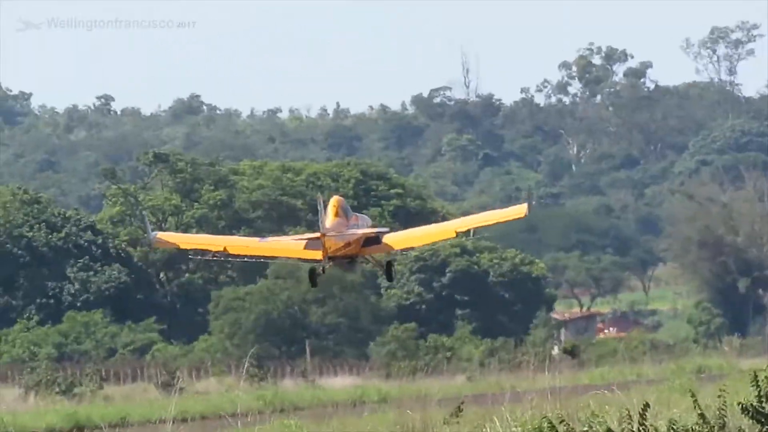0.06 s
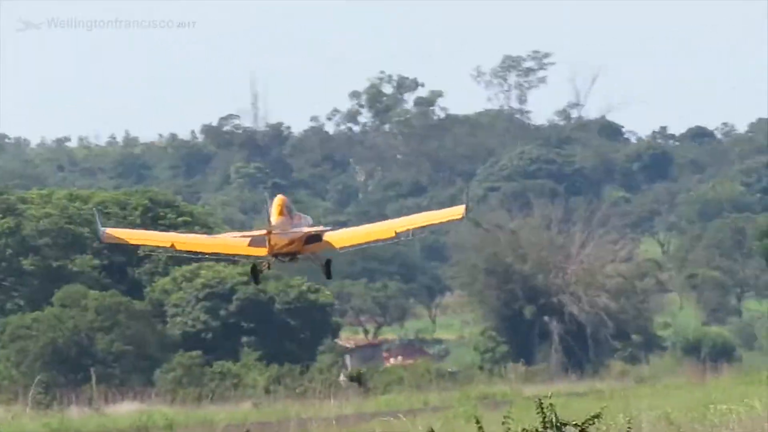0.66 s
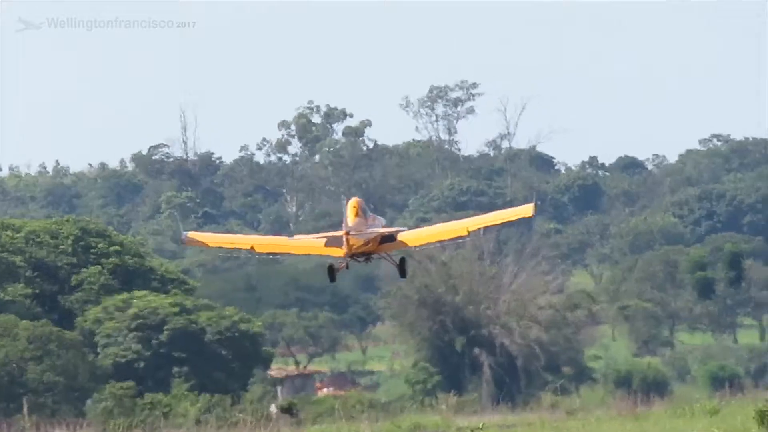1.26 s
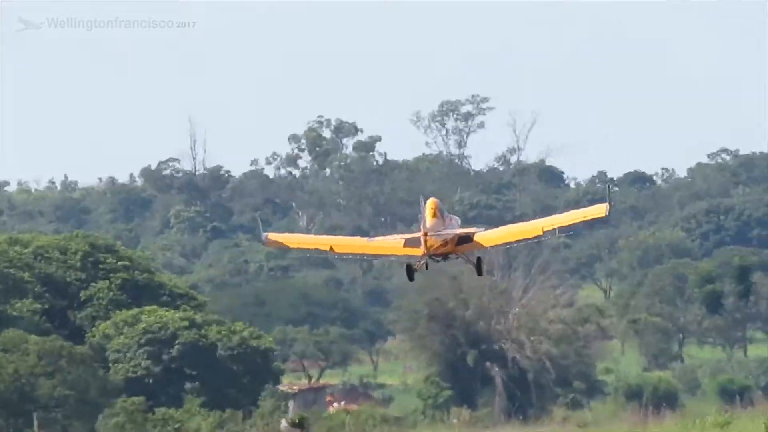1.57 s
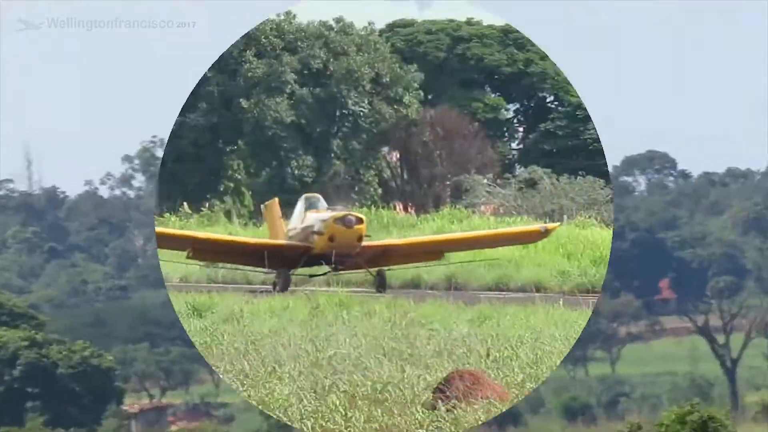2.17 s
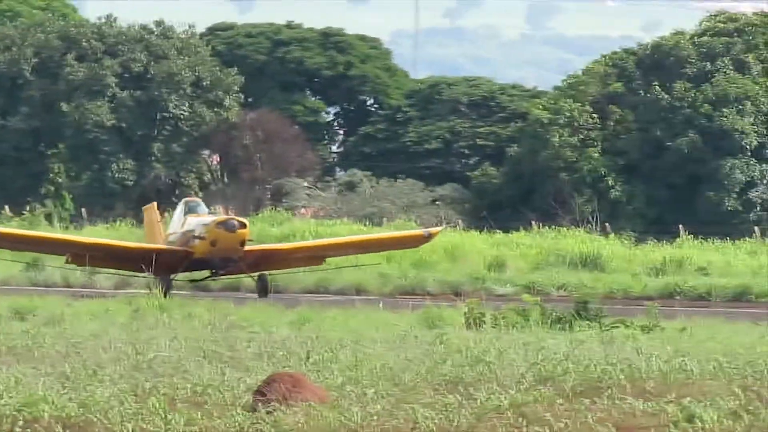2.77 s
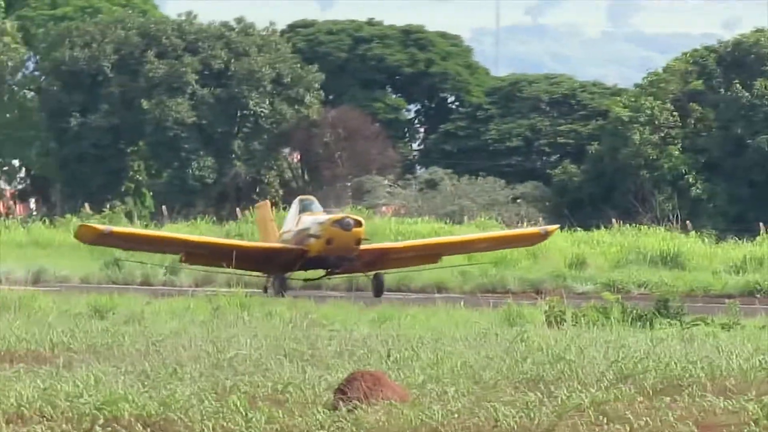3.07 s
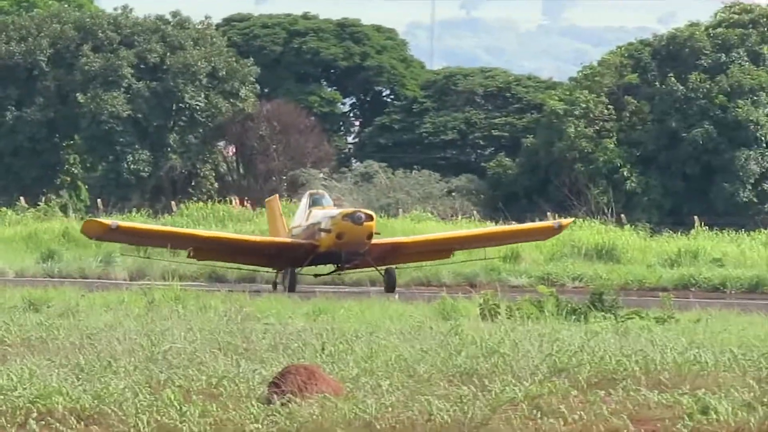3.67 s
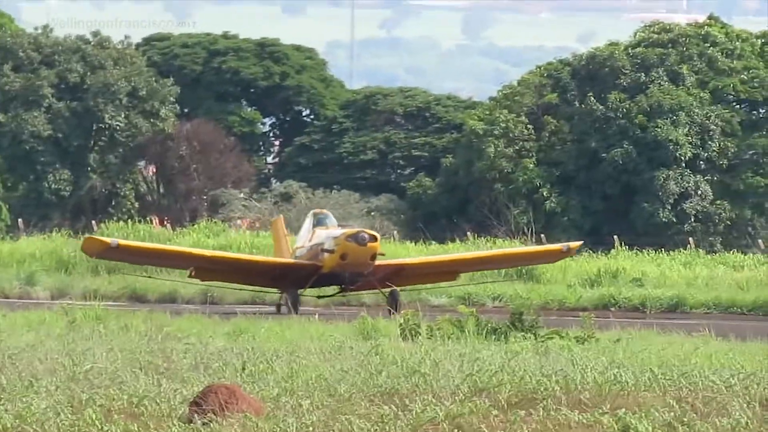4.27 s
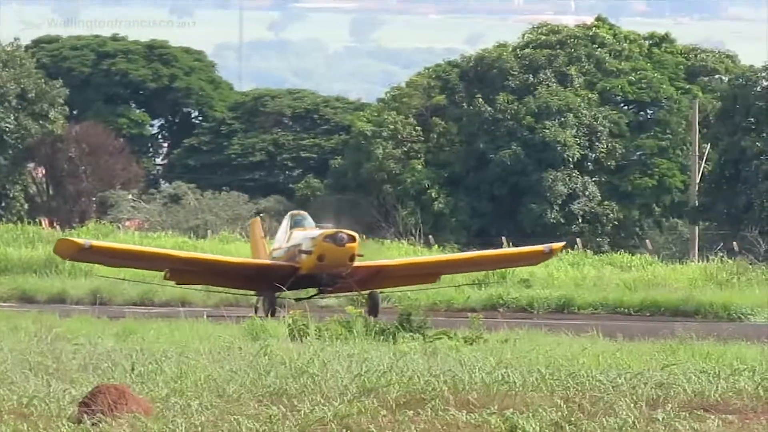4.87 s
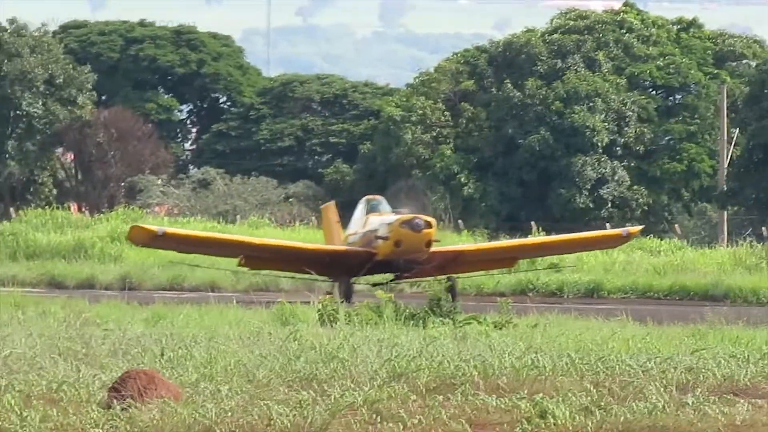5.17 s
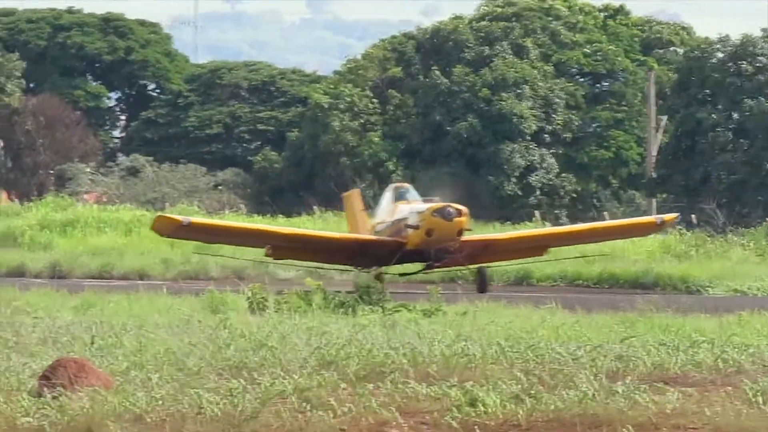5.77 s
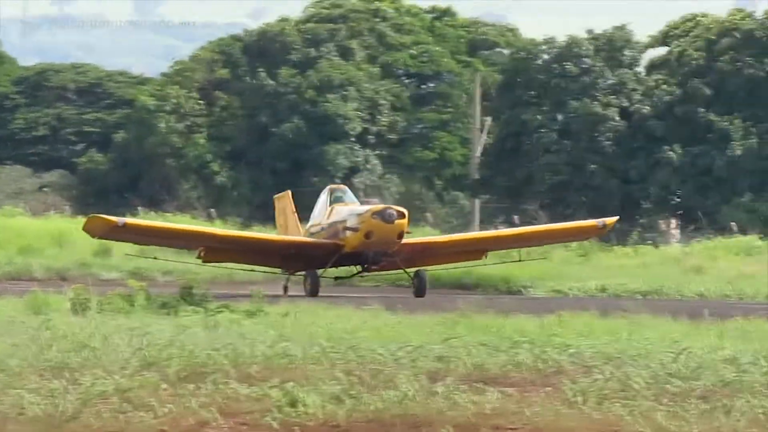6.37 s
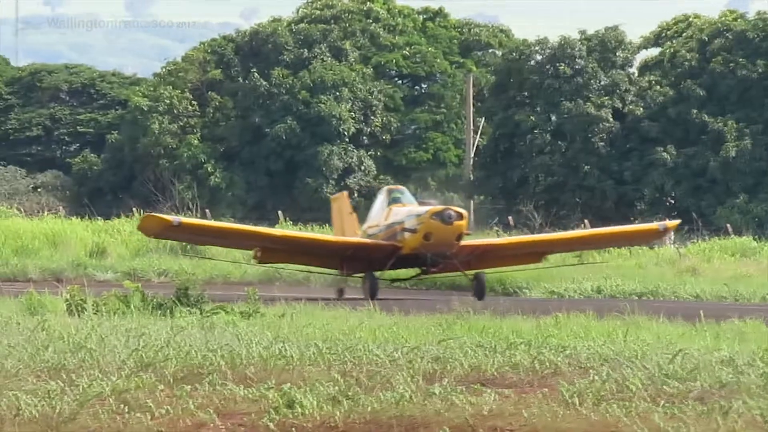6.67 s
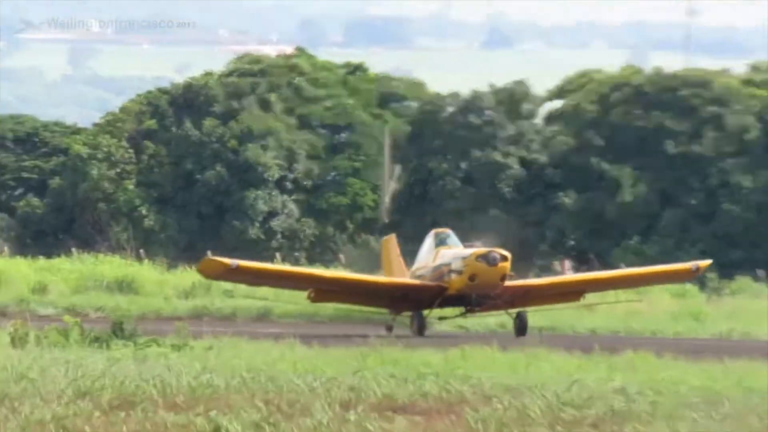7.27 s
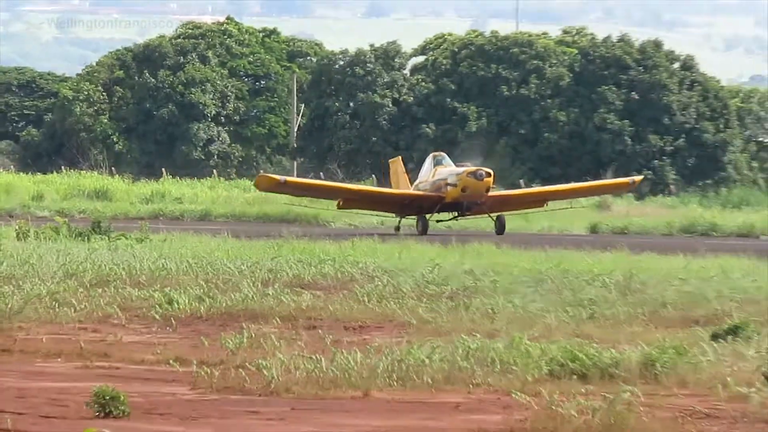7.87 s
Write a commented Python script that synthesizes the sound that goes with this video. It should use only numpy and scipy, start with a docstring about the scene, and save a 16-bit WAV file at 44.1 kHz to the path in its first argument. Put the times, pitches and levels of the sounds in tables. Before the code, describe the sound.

Outdoors by a grass-lined airstrip, a throttled-back plane hums in the distance while a bird chirps faintly and an insect barely trills. A quick cross-fade then brings a single piston-engine propeller plane close to the microphone at full power. Its loud, slightly higher drone stays steady in pitch, with a gritty exhaust rasp and fast ticking knocks that sometimes crack harder, gaining a little volume and brightness until the end.

```python
"""A crop duster drones far off over the fields, throttled back, while an insect trills and a bird chirps
in the grass. A cross-fade brings the plane up close, at full power on the airstrip, growing louder and
brighter as it rolls nearer. Eight uneven exhaust pulses a cycle drone with the propeller, and every
firing spits rasping gas. Up close, one cylinder cracks once a cycle."""
import sys
import numpy as np
from scipy import signal
from scipy.fft import rfft, irfft, next_fast_len
from scipy.io import wavfile
from scipy.ndimage import map_coordinates

SR = 44100
rng = np.random.default_rng(int(sys.argv[2]) if len(sys.argv) > 2 else 0)


def wav_out(sig):
    """Save sig, one row per channel (or a flat mono array), as 16-bit PCM at SR to the path in sys.argv[1]."""
    wavfile.write(sys.argv[1], SR, np.round(np.clip(np.atleast_2d(sig).T, -1, 1) * 32767).astype(np.int16))


N = 358533
TIME = np.arange(N) / SR
HZ = np.fft.rfftfreq(N, 1 / SR)

# the drone's partials, near and far: multiple_of_cycle, relative_db
NEAR_ORDERS = [(2, -34), (3, -18), (4, -26.5), (5, -6.5), (6, -2), (7, -4), (8, 2.5), (9, -7.5), (10, -5),
               (11, -2), (12, -12.5), (13, -15.5), (14, -16), (15, -11), (16, -22), (18, -30.5),
               (19, -27.5), (21, -32), (22, -36.5), (27, -26.5), (29, -39), (30, -39), (32, -39), (35, -35),
               (36, -40), (42, -41), (43, -40)]
FAR_ORDERS = [(3, -14), (4, -7), (6, 6), (7, -20.5), (8, -14.5), (9, -3), (10, -14), (12, -3.5),
              (13, -19.5), (14, -27.5), (15, -15), (18, -26), (32, -34.5), (86, -31)]
# the exhaust's rhythm, one row a cylinder: place_cycles, pulse_db, gas_burst_db
FIRINGS = [(-.015, .3, 2), (.123, -4.4, -5), (.255, 2.3, -2), (.393, -1.6, -2), (.482, 0, -2),
           (.612, -.1, -4), (.735, 2.7, -3), (.854, .5, -5)]
# the propeller's rhythm, one row a blade: place_cycles, pulse_db
BLADES = [(0, 0), (1 / 3, -1), (2 / 3, -2)]
# two notes are beamed, and change as the plane turns: time_s, firing_note_db, next_order_db
BEAMED_NOTES = [(2.6, 4, 5.5), (3.2, 1.14, 1.5), (4.9, 1.96, 4.5), (6.7, 0, -4), (7.05, -1.5, -3.5),
                (7.5, -1.5, 1.5), (8.1, -1.5, -1)]
# the 600 Hz overtone fades in and out: time_s, gain_db
OVERTONE_RIDE = [(2.3, -8), (2.75, 0), (3.9, -.5), (4.5, -3.5), (5.1, -13), (5.8, -2), (6.5, -11),
                 (6.95, -5), (7.4, -10), (8.1, -8)]
# colour of the exhaust gas, near and far: frequency_hz, gain_db
NEAR_RASP_EQ = [(300, -31.5), (450, -5), (600, -1), (740, -3.5), (950, 4.5), (1230, 4.5), (1640, 1.5),
                (2350, 2), (2850, -9.5), (3650, -11.5), (5900, -25), (7600, -35), (9800, -48.5),
                (12000, -65.5)]
FAR_RASP_EQ = [(220, -32.5), (380, -3), (500, 0), (581, -3), (618, -2.5), (850, -6.5), (1050, -3),
               (1280, -7.5), (1680, -6.5), (1900, -8), (2240, -9), (4290, -21.5), (4980, -19.5),
               (5710, -28), (7520, -33), (9780, -39), (16500, -120)]
# how alike the gas sounds left and right, near and far: frequency_hz, likeness (1 is mono)
NEAR_LIKENESS = [(400, 0.42), (950, 0.95), (2200, 0.97), (5000, 0.98), (7000, .88), (10000, .4)]
FAR_LIKENESS = [(400, 0.15), (1000, 0.16), (2000, 0.81), (5000, 0.24)]
# colour of the slipstream, near and far: frequency_hz, gain_db
NEAR_CHURN_EQ = [(20, -33), (40, -23.5), (65, -11.5), (120, -3), (230, -2.5), (330, -7.5), (450, -19.5),
                 (700, -22.5), (1500, -80)]
FAR_CHURN_EQ = [(20, -33.5), (40, 1.5), (70, 12), (130, 6), (230, 13), (330, -1), (450, -64), (1200, -41.5)]
# the exhaust's main resonance shifts as the plane turns: time_s, pitch_hz, added_gain
EXHAUST_RESONANCE = [(2.5, 1600, .5), (3.1, 1750, 1.3), (3.55, 1520, .7), (3.9, 1620, .8), (4.4, 1560, .6),
                     (5.1, 1780, .4), (6.0, 1880, .5), (6.5, 2170, 1.3), (7.05, 2060, 1.4),
                     (7.35, 1740, 1.1), (7.75, 1780, .7), (8.1, 1900, .3)]
# fader rides on the near plane's bands, from pipe hum up to top hiss: time_s, level_db
HUM_RIDE = [(2.65, -43.5), (3.6, -41.5), (4.5, -45.5), (5.15, -53), (5.85, -46), (6.4, -48), (7.0, -42),
            (7.5, -45.5), (8.1, -41)]
RASP_RIDE = [(2.45, -41.5), (3.05, -45), (3.85, -40), (4.799, -40.5), (5.602, -39), (6.5, -40),
             (7.151, -44), (7.5, -42.5), (8.101, -38)]
BARK_RIDE = [(2.6, -38), (2.9, -42.5), (3.4, -42.5), (3.85, -38.5), (4.3, -41), (4.95, -39.5),
             (5.85, -34.5), (6.65, -37.5), (7.15, -38.5), (7.32, -37), (7.7, -33.5), (8.1, -32)]
TREBLE_RIDE = [(2.6, -49.5), (3.0, -55.5), (3.6, -47.5), (4.3, -49.5), (4.95, -47), (5.2, -40.5),
               (5.75, -41), (6.2, -43.5), (6.6, -43), (7.15, -50.5), (7.6, -48), (8.05, -40.5)]
HISS_RIDE = [(2.701, -57), (3.099, -58.5), (3.5, -56), (4.4, -53.5), (4.9, -54.5), (5.3, -50), (5.8, -46),
             (6.2, -50), (6.7, -53.5), (7.18, -55), (7.42, -50), (8.05, -48.5)]
# colour of the exhaust stack's ring and of the dry snap of escaping gas: frequency_hz, gain_db
KNOCK_EQ = [(600, -25), (950, -3), (1250, -2), (1600, 5), (2300, 5), (2800, -5), (4000, -40), (7000, -100)]
TICK_EQ = [(2000, -30), (2900, -3), (3600, 0), (4500, -7), (6000, -19), (7600, -37), (10000, -68),
           (13000, -80)]
# cycles that crack extra hard: time_s, knock_db, tick_db
HARD_CRACKS = [(3.5921, -29, -37), (3.7272, -28, -49), (3.8605, -27, -44), (3.9058, -28, -44),
               (3.9974, -31, -43), (5.2528, -24.5, -28.5), (5.297, -30.5, -29), (5.3427, -28.5, -29),
               (5.476, -26, -33), (5.565, -26.5, -40), (5.6104, -25.5, -34), (5.6562, -24.5, -36),
               (5.79, -27, -39), (5.88, -25.5, -36), (5.924, -26.5, -39), (6.1029, -25, -37.5),
               (6.506, -29, -38), (6.593, -24, -41), (6.682, -29, -37), (6.817, -32, -46),
               (7.3048, -26, -44.5), (7.3493, -23.5, -44.5), (7.438, -21.5, -36), (7.482, -24, -44),
               (7.5255, -24, -41), (7.5714, -20, -40), (7.661, -23, -38), (7.7046, -24, -36),
               (7.7933, -23.5, -34), (7.834, -23, -34), (7.925, -35, -35), (8.0126, -25.5, -28),
               (8.1013, -25.5, -39.5)]
# bird calls: start_s, length_s, start_pitch_hz, end_pitch_hz, arch_hz, harmonic_3_db, harmonic_4_db
CHIRPS = [(0.204, 0.073, 983, 943, 20, -66, -82), (.55, .13, 1040, 960, 50, -60, -78),
          (1.49, 0.075, 887, 867, 33, -66, -80), (2.015, .19, 945, 930, 145, -67, -67),
          (2.47, 0.18, 1095, 1115, 40, -56, -54)]
# balance of the two microphone ports: frequency_hz, left_over_right_db
PORT_BALANCE = [(110, 0.4), (180, -0.8), (245, -2.5), (335, -1.5), (470, -5), (600, 0.5), (2400, -0.5),
                (2900, 4.5), (3500, 0)]
# phase between the ports: frequency_hz, left_lead_rad
PORT_PHASE = [(60, 0.011), (115, -0.17), (180, -0.25), (335, 0.13), (600, -0), (2400, 0.13), (2900, 0.034),
              (3500, 0.0066), (5000, 0.52), (6500, -0.2)]

MIDWAY_S = 5.3  # the near plane's level ramps pivot here
BUMP_S = .84  # the far drone swells with a soft bump


def near_plane(drone_db=-12, drone_db_per_s=.35, overtone_order=27):
    """Full power on the strip; the plane grows louder and brighter as it rolls closer."""
    cycles = engine_cycles(rate_hz=22.327, hz_per_s=.0945, wobble_cycles=.0005)
    boosts_db = dict(enumerate(curves(BEAMED_NOTES), start=len(FIRINGS)))
    boosts_db[overtone_order] = curves(OVERTONE_RIDE)[0]
    engine = drone(cycles, NEAR_ORDERS, FIRINGS, boosts_db, waver=.12, waver_hz=8)
    engine += amp(-21) * slipstream(NEAR_CHURN_EQ)
    gas = exhaust_rasp(cycles, NEAR_RASP_EQ, NEAR_LIKENESS, wash=.55, ring=.42)
    ring_hz, ring_gain = curves(EXHAUST_RESONANCE)
    gas += ring_gain * resonate(gas, ring_hz, width_hz=380)
    gas = moving_air(ground_echo(gas), depth_db=1.6, rate_hz=6)
    mix = engine + amp(-23) * unit_rms(gas)
    # split into six bands, each on its own fader
    faders_db = [drone_db + drone_db_per_s * (TIME - MIDWAY_S)]
    faders_db += [curves(ride)[0] for ride in (HUM_RIDE, RASP_RIDE, BARK_RIDE, TREBLE_RIDE, HISS_RIDE)]
    crossovers_hz = [0, 555, 760, 1300, 2900, 4200, SR]
    body = sum(amp(db) * unit_rms(filtered(mix, band(lo_hz, hi_hz) ** 2))
               for db, lo_hz, hi_hz in zip(faders_db, crossovers_hz, crossovers_hz[1:]))
    return body + cylinder_cracks(cycles)


def far_plane(drone_db=-32, rasp_db=-50.5, swell_db=4.5):
    """Throttled back and distant: a soft, slowly sagging drone; its smeared rasp rings for a moment."""
    cycles = engine_cycles(rate_hz=19.41, hz_per_s=-.027, wobble_cycles=.005)
    ringing = swell(peak_s=.5, width_s=.25)
    engine = drone(cycles, FAR_ORDERS, BLADES, boosts_db={32: 7 * ringing}, waver=.13, waver_hz=9)
    engine += amp(-12) * slipstream(FAR_CHURN_EQ)
    gas = exhaust_rasp(cycles, FAR_RASP_EQ, FAR_LIKENESS, wash=1, ring=.1)
    gas = moving_air(gas, depth_db=1.5, rate_hz=12)
    ring = amp(-61) * ringing * narrow_noise(hz=1670, width_hz=70)
    engine_db = drone_db + swell_db * swell(BUMP_S, width_s=.012)
    return amp(engine_db) * unit_rms(engine) + amp(rasp_db) * unit_rms(gas) + ring


def engine_cycles(rate_hz, hz_per_s, wobble_cycles, anchor_s=5.2525):
    """Count of engine cycles, two propeller turns each; the speed glides through rate_hz at anchor_s."""
    t = TIME - anchor_s
    return rate_hz * t + hz_per_s * t ** 2 / 2 + wobble_cycles * drift(22)


def drone(cycles, orders, pulses, boosts_db, waver, waver_hz):
    """Engine orders phased by the pulses; in moving air weak ones waver most, high ones blur and fade."""
    place, pulse_db = np.transpose(pulses)[:2]
    out = np.zeros(N)
    for order, db in orders:
        phase = np.angle(np.sum(amp(pulse_db) * np.exp(-2j * np.pi * order * place)))
        unsteady = 1 + min(waver * amp(-.4 * db), .25) * drift(waver_hz)
        fading_db = 3.5 * (order > 20) * drift(2.5)
        blur_rad = .35 * np.clip(order / 20 - .7, 0, 2) * drift(11)
        gain = amp(db + boosts_db.get(order, 0) + fading_db) * unsteady
        out += gain * np.cos(2 * np.pi * order * cycles + phase + blur_rad)
    return unit_rms(out)


def exhaust_rasp(cycles, eq, stereo_likeness, wash, ring):
    """Stereo gas noise, gated by the firings over the steady propeller wash."""
    power = wash ** 2
    for place, _, burst_db in FIRINGS:
        power += (amp(burst_db) * gas_bursts(cycles - place)) ** 2
    envelope = np.sqrt(power)
    mid, side = envelope * rng.standard_normal((2, N))
    likeness = np.clip(eq_curve(stereo_likeness), 0, .999)
    side = filtered(side, np.sqrt((1 - likeness) / (1 + likeness)))
    mid += ring * envelope * pipe_ring(cycles)
    return filtered(np.array([mid + side, mid - side]), amp(eq_curve(eq)))


def gas_bursts(cycles, rise_cycles=.045, decay_cycles=.1, uneven_db=4):
    """Envelope of one puff of gas a cycle, each with its own force."""
    number, age = np.divmod(cycles + rise_cycles, 1)
    force = amp(uneven_db * rng.uniform(-1, 1, 256))[number.astype(int)]
    attack = np.minimum(age / rise_cycles, 1)
    return force * attack * np.exp(-np.maximum(age - rise_cycles, 0) / decay_cycles)


def pipe_ring(cycles, memory=.86, size=256):
    """The pipes ring much as they did a cycle before, which leaves fine, broken lines in the rasp."""
    noise_by_cycle = signal.lfilter([1], [1, -memory], rng.standard_normal((size, size)), axis=0)
    playhead = (cycles - cycles[0] + 10) * size  # ten cycles in, the ring has built up
    return unit_rms(map_coordinates(noise_by_cycle.ravel(), [playhead], order=3))


def cylinder_cracks(cycles, scatter_db=2.5, knock_db_per_s=.5, tick_hz=3580):
    """One cylinder cracks once a cycle: a dry tick and a ringing knock, now and then much harder."""
    times = np.interp(np.arange(np.ceil(cycles[0]), cycles[-1]), cycles, TIME)
    force_db, tilt_db = scatter_db * rng.uniform(-1, 1, (2, len(times)))
    # the knock rides above the bark, the tick just above the treble
    knock_db = np.interp(times, *np.transpose(BARK_RIDE)) + 3.5 + force_db + tilt_db / 2
    tick_db = np.interp(times, *np.transpose(TREBLE_RIDE)) + .6 + force_db - tilt_db / 2
    knock_db += knock_db_per_s * (times - MIDWAY_S)  # stands out more as the plane nears
    for time_s, hard_knock_db, hard_tick_db in HARD_CRACKS:
        nearest = np.argmin(abs(times - time_s))
        times[nearest], knock_db[nearest], tick_db[nearest] = time_s, hard_knock_db, hard_tick_db
    knock_detune, tick_detune = 1 + .05 * rng.standard_normal((2, len(times)))
    knocks_hz = knock_detune * np.interp(times, TIME, curves(EXHAUST_RESONANCE)[0])
    ticks_hz = tick_detune * tick_hz
    knocks = puffs(times, knock_db, KNOCK_EQ, knocks_hz, ring=1.3, width_hz=200,
                   rise_s=.0012, decay_s=.0019)
    ticks = puffs(times, tick_db, TICK_EQ, ticks_hz, ring=.7, width_hz=250, rise_s=.0015, decay_s=.002)
    return knocks + ticks


def puffs(times, levels_db, eq, rings_hz, ring, width_hz, rise_s, decay_s, size=2048):
    """Short bursts of gas that ring at their own pitch, each as strong as 3 ms of sound at its level."""
    t = (np.arange(size) - size // 2) / SR
    hz = np.fft.rfftfreq(size, 1 / SR)
    envelope = np.exp(np.where(t < 0, -(t / rise_s) ** 2, -t / decay_s))
    resonance = 1 + ring / (1 + 2j * (hz - rings_hz[:, None]) / width_hz)
    colour = np.interp(hz, HZ, amp(eq_curve(eq))) * resonance
    bursts = envelope * rng.standard_normal((len(times), size))
    hits = irfft(rfft(bursts) * colour) * np.hanning(size)
    out = np.zeros(N + size)
    for time_s, db, hit in zip(times, levels_db, hits):
        at = min(round(time_s * SR), N)
        out[at:at + size] += amp(db) * hit * np.sqrt(.003 * SR / np.sum(hit ** 2))
    return out[size // 2:][:N]


def slipstream(eq):
    """Low turbulence that churns between the engine orders."""
    return unit_rms(filtered(rng.standard_normal(N), amp(eq_curve(eq))))


def ground_echo(x, gain=.23, delay_s=.00119):
    """A reflection just behind the direct sound combs the treble."""
    return filtered(x, abs(1 + gain * np.exp(-2j * np.pi * HZ * delay_s)))


def moving_air(x, depth_db, rate_hz, bands=16):
    """Moving air over the field makes neighbouring bands swell and fade apart."""
    position = np.interp(HZ, [700, 7000], [0, bands - 1])
    slices = (filtered(x, np.maximum(1 - abs(position - k), 0)) for k in range(bands))
    return sum(amp(depth_db * drift(rate_hz)) * part for part in slices)


def bump(level_db=-48):
    """A soft low bump swells out of the distant drone."""
    thud = unit_rms(filtered(rng.standard_normal(N), band(290, 400)))
    return amp(level_db) * swell(BUMP_S, width_s=.033) * thud


def bird(trill=.025, broken_db=4):
    """Short, hoarse, broken chirps that arch in pitch; only harmonics 3 and 4 sound."""
    out = np.zeros(N)
    for start_s, length_s, start_hz, end_hz, arch_hz, third_db, fourth_db in CHIRPS:
        progress = np.clip((TIME - start_s) / length_s, 0, 1)
        arch = np.sin(np.pi * progress)
        glide_hz = start_hz + (end_hz - start_hz) * progress + arch_hz * arch
        phase = 2 * np.pi * np.cumsum(glide_hz * (1 + trill * drift(700))) / SR
        for harmonic, db in ((3, third_db), (4, fourth_db)):
            out += amp(db + broken_db * drift(90)) * arch * np.sin(harmonic * phase)
    return out


def insect(throb=.42, throb_hz=19):
    """A thin, throbbing trill in the grass rises and falls in one slow swell."""
    strokes = np.sin(2 * np.pi * throb_hz * TIME + drift(6))
    level_db = -86.5 + 15 * swell(peak_s=1, width_s=.77)
    return amp(level_db) * narrow_noise(hz=5020, width_hz=130) * (1 + throb * strokes)


def amp(db):
    """Decibels to gain."""
    return 10 ** (np.asarray(db) / 20)


def unit_rms(x):
    """Normalises to rms 1."""
    return x / np.sqrt(np.mean(x ** 2) + 1e-20)


def curves(rows):
    """A time table as automation curves, one for each value column."""
    times, *columns = np.transpose(rows)
    return [np.interp(TIME, times, column) for column in columns]


def eq_curve(points):
    """A frequency table drawn over HZ, its points joined on a log axis."""
    hz, value = np.transpose(points)
    return np.interp(np.log(HZ + 1), np.log(hz + 1), value)


def filtered(x, gain, edge=2048):
    """Applies a gain drawn over HZ, with mirrored ends."""
    x = np.pad(x, [(0, 0)] * (x.ndim - 1) + [(edge, edge)], "reflect", reflect_type="odd")
    size = next_fast_len(N + 2 * edge, True)
    response = np.interp(np.fft.rfftfreq(size, 1 / SR), HZ, gain)
    return irfft(rfft(x, size) * response, size)[..., edge:edge + N]


def band(lo_hz, hi_hz):
    """Gain of a steep band-pass."""
    return ((1 + (lo_hz / (HZ + 1)) ** 20) * (1 + (HZ / hi_hz) ** 20)) ** -.5


def resonate(x, hz, width_hz):
    """A unity-gain resonance swept along the curve hz."""
    carrier = np.exp(2j * np.pi * np.cumsum(hz) / SR)
    pole = np.exp(-np.pi * width_hz / SR)
    return 2 * (carrier * signal.lfilter([1 - pole], [1, -pole], x / carrier)).real


def narrow_noise(hz, width_hz):
    """Noise in one resonance, rms 1."""
    return unit_rms(filtered(rng.standard_normal(N), 1 / (1 + ((HZ - hz) / width_hz) ** 2)))


def drift(rate_hz):
    """A random modulator of about unit size."""
    knots = rng.standard_normal(4096)
    return np.interp(TIME * rate_hz, np.arange(len(knots)), knots)


def swell(peak_s, width_s):
    """A bell-shaped rise and fall."""
    return np.exp(-((TIME - peak_s) / width_s) ** 2)


def fade(silent_s, full_s):
    """A curved fade between silence and full level, in either direction."""
    return np.clip((TIME - silent_s) / (full_s - silent_s), 0, 1) ** 1.74


def scene():
    """The far plane and the insect cross-fade into the near plane; the bird stays outside the fade."""
    far = (far_plane() + bump() + insect()) * fade(silent_s=2.34, full_s=1.57)
    near = near_plane() * fade(silent_s=1.866, full_s=2.813)
    return far + near + bird()


def record(dry, top_hz=13000, end_fade_s=.003):
    """Two microphone ports, slightly apart in level and phase; then a high cut and soft ends."""
    ports = amp(eq_curve(PORT_BALANCE) / 2) * np.exp(.5j * eq_curve(PORT_PHASE))
    pair = np.array([filtered(dry[0], ports), filtered(dry[1], 1 / ports)])
    ends = np.minimum(np.minimum(TIME, TIME[-1] - TIME) / end_fade_s, 1)
    return ends * filtered(pair, band(0, top_hz) ** 4)


dry = scene()
out = record(dry)
wav_out(out)
```